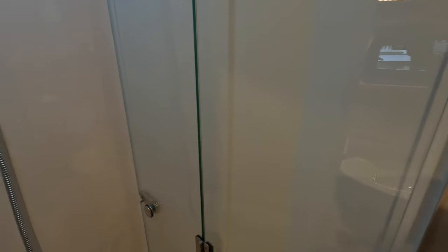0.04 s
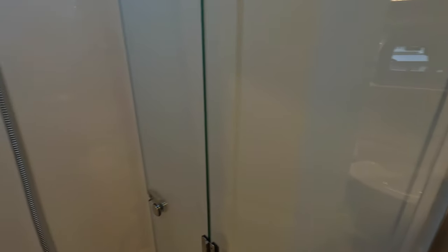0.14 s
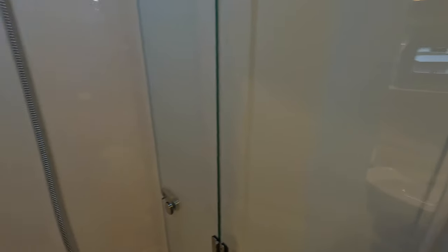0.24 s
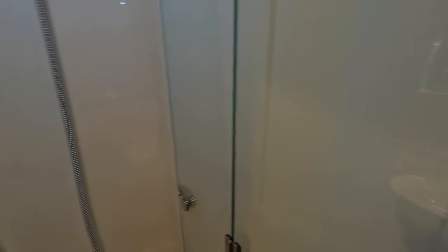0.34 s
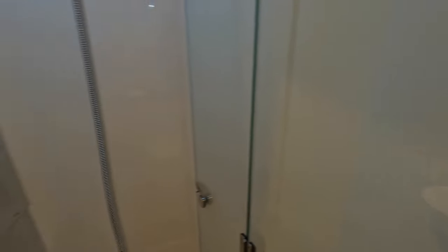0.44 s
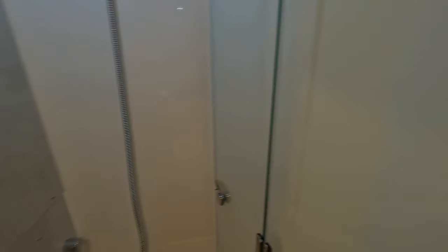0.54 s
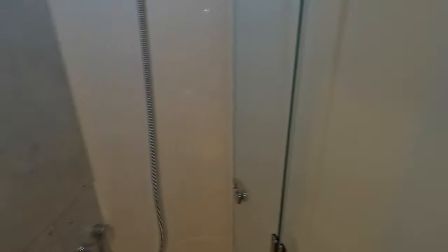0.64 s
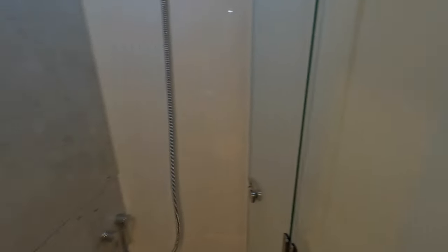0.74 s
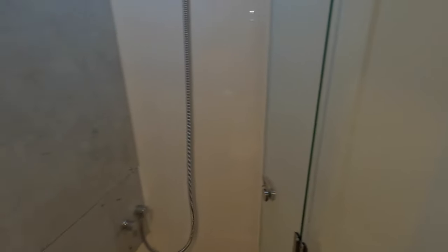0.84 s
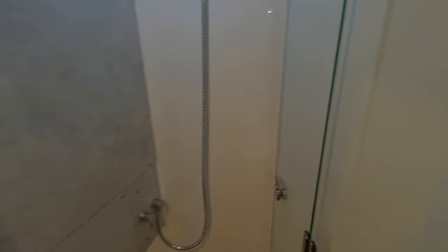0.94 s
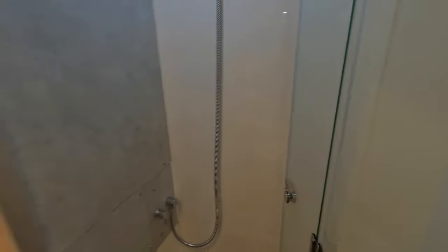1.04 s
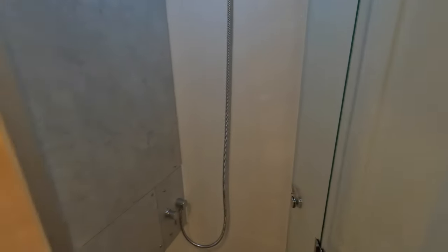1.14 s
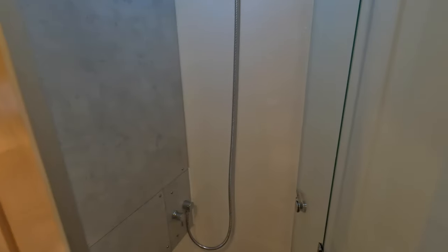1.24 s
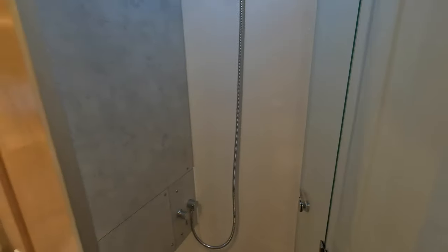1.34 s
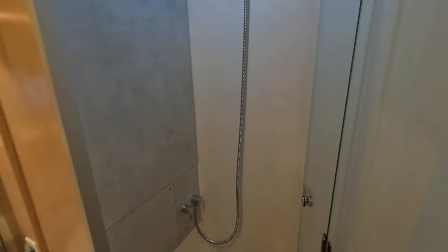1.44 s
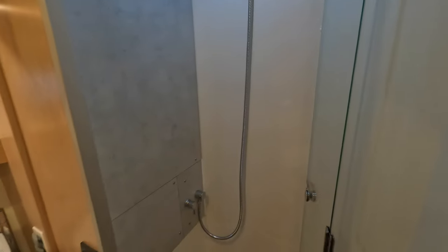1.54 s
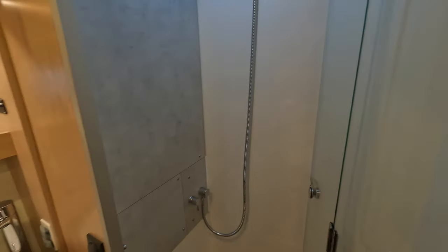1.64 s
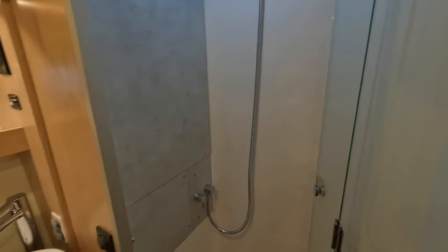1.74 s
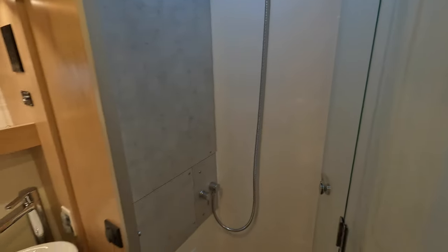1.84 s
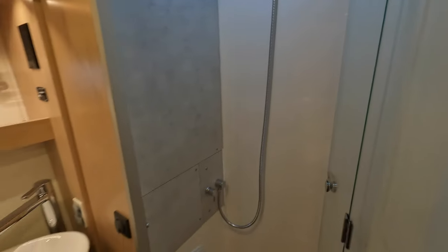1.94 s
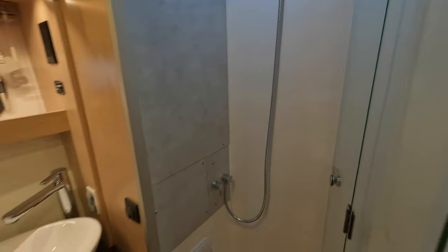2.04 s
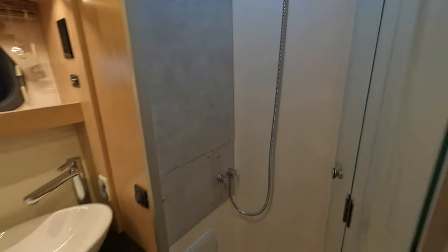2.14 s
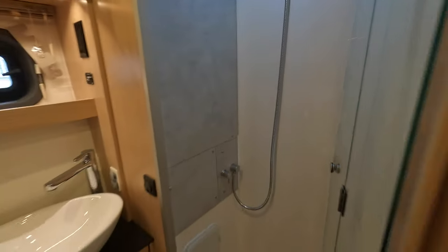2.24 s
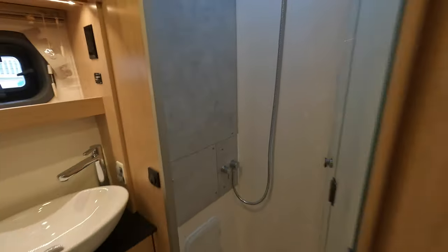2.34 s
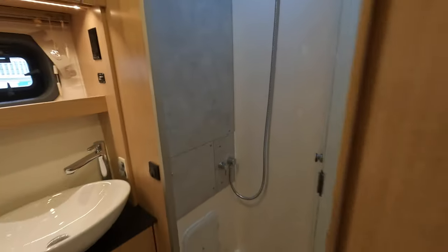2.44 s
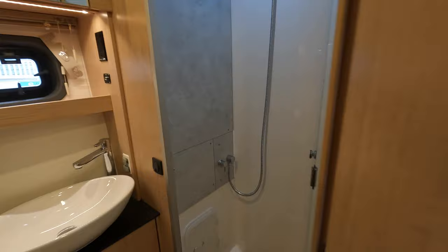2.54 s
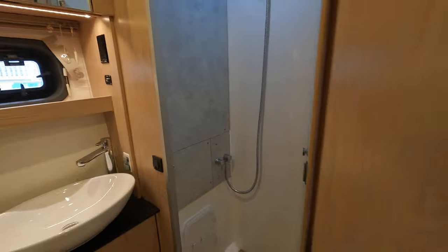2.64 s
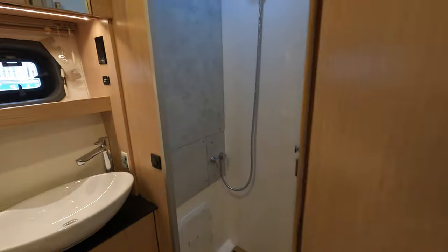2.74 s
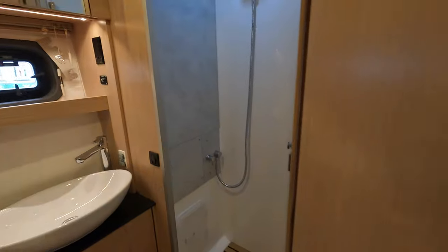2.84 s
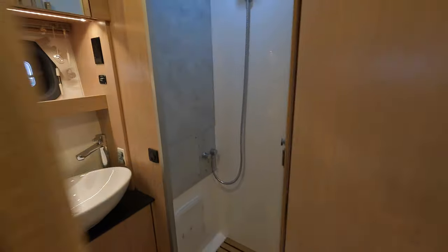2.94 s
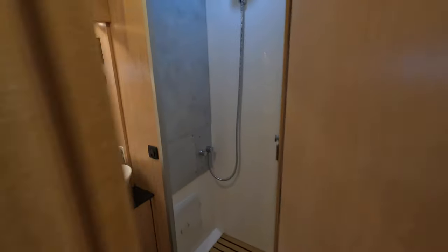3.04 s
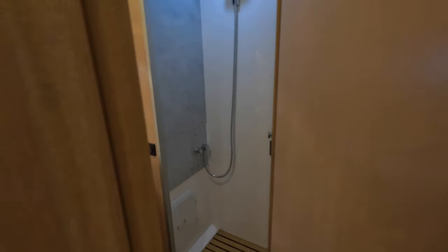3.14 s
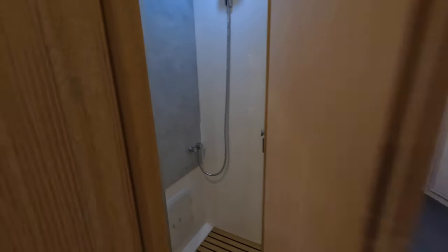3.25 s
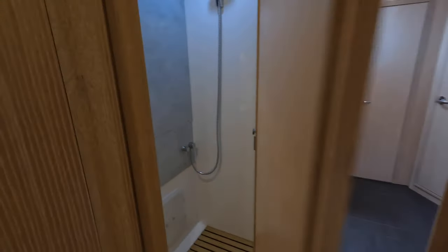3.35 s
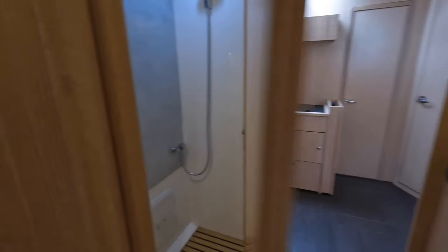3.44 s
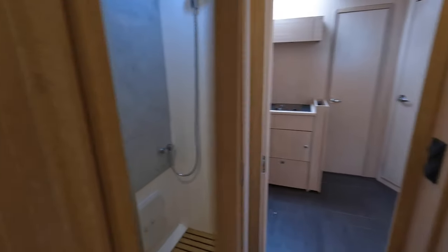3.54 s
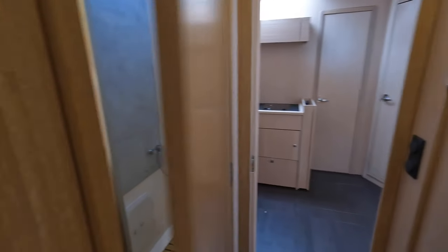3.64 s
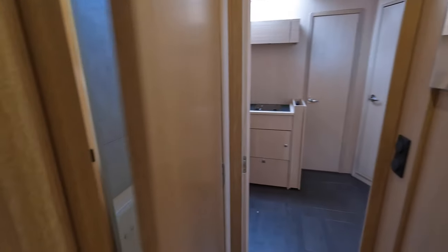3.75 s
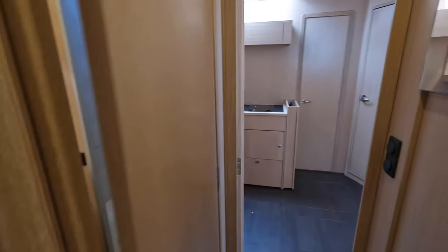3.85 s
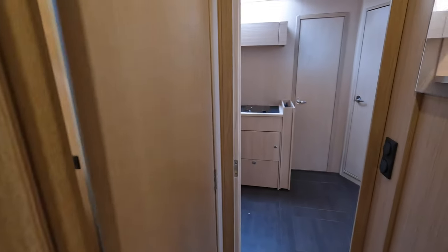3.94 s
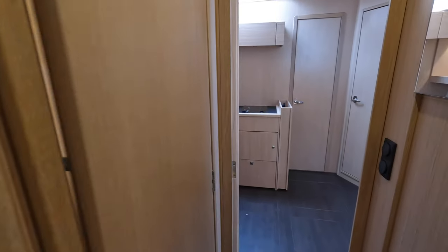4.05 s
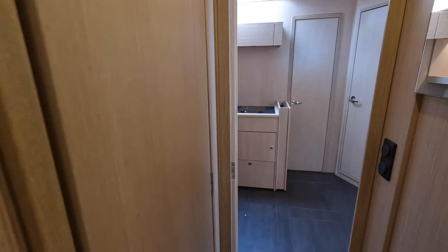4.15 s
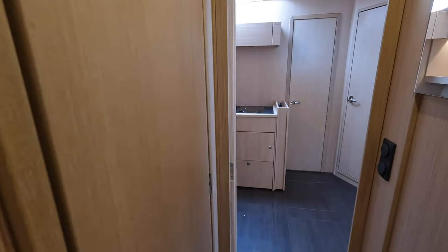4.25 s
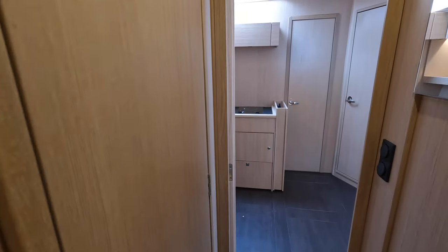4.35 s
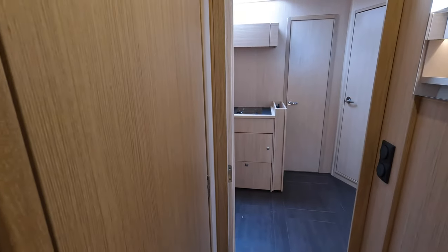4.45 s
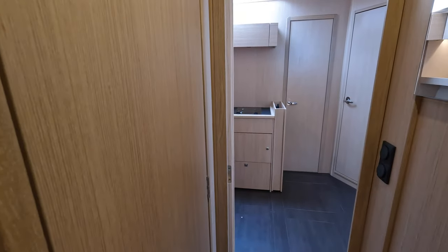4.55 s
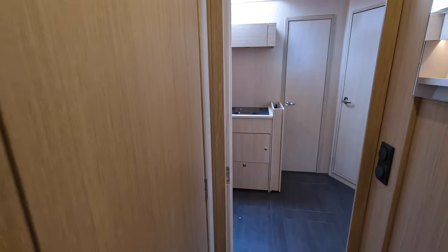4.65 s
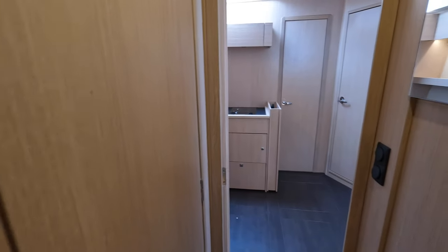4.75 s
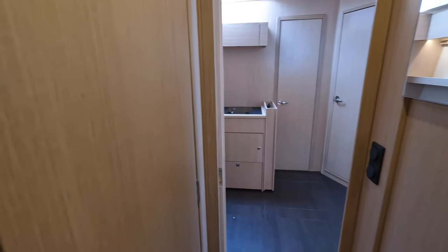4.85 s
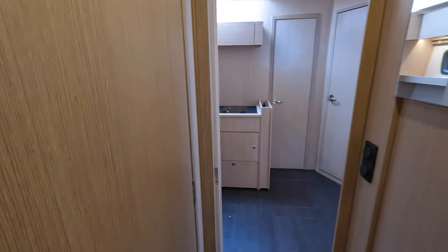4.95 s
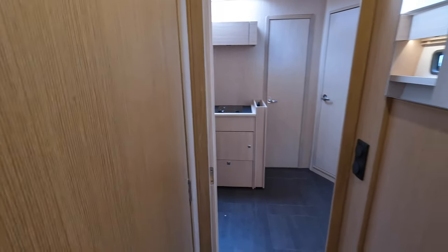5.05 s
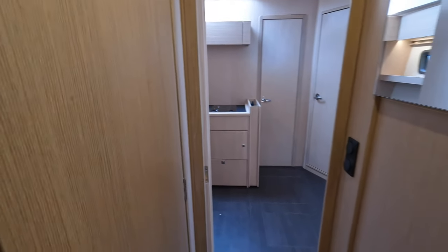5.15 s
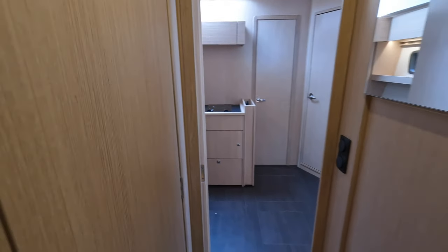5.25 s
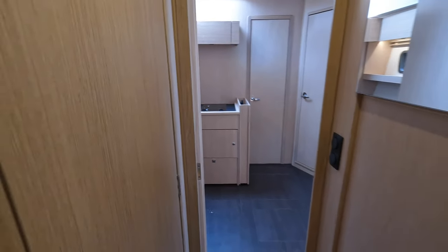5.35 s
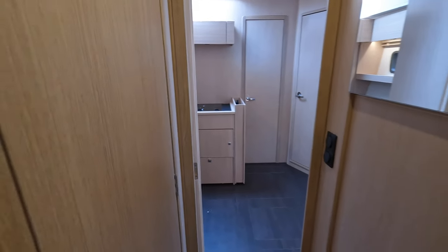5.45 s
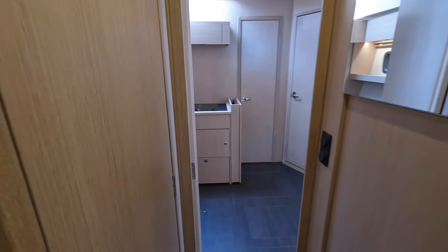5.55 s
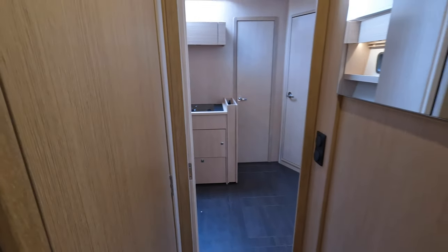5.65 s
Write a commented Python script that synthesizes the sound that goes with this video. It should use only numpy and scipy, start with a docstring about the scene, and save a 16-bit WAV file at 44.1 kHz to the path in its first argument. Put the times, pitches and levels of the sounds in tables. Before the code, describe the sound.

Quiet handheld movement over faint air noise and hiss: brief drags on panels, dull footsteps and felt thuds. Around the middle a bright metal handle click, a knock and a small catch click. Then the loudest event, a latch clack followed by a heavy low door thump with short boxy reverberation. Light jingling of fittings and two close knocks end it.

```python
"""Steps knock on sole boards, cloth rustles and drags, a handle clicks and a door swings shut: latch, then deep thump.
Someone is backing out of a small wooden boat cabin, over a low rumble of movement, air noise and microphone hiss.
Blows are filtered impulses with noise rattle and ringing modes; the door's boom is low modes driven by half-sine pushes.
Drags are uneven noise through board modes; rustle, rumble, bolt scrape and floor are coloured noise under level curves.
Thuds are short low sines, ticks noise bursts; blows, drags and bolt also feed a cabin reverberation."""
import sys
import numpy as np
from scipy import signal
from scipy.fft import rfft, irfft
from scipy.io import wavfile
from scipy.ndimage import uniform_filter1d

SR = 44100
rng = np.random.default_rng(int(sys.argv[2]) if len(sys.argv) > 2 else 0)


def to_wav(s):
    """Save 16-bit WAV."""
    ch = np.atleast_2d(s).T  # columns
    pcm = np.round(np.clip(ch, -1, 1) * 32767)  # PCM
    wavfile.write(sys.argv[1], SR, pcm.astype(np.int16))


N = 250950

# ringing of the boards: (frequency [Hz], level [dB], t60 [s])
BOARD_MODES = [(215, -4, 0.2), (266.5, -3, 0.15), (335, -7, 0.2), (410, -4, 0.12), (480, -4, 0.12),
               (572, -5, 0.06), (740, -5, 0.08)]
# ringing of the latch and small fittings: (frequency [Hz], level [dB], t60 [s])
LATCH_MODES = [(800, -4, .06), (1170, -1, .06), (1340, -3, .06), (1820, 2, .06), (2190, 2, .07),
               (3150, -3, .07), (3900, -2, .08), (4829, 2, .2), (5534, -2, .08), (6035, -2, .08),
               (7700, -2, .06)]
# colour of latch clicks, before hardness tilt, and of the bolt scrape: (frequency [Hz], level [dB])
LATCH_COLOUR = [(90, -56), (320, -19), (650, -2), (1200, -0.2), (2350, -4.5), (2700, -9), (5500, -16),
                (11000, -24), (15500, -38)]


def gain_of(db):
    """Decibels to amplitude gain."""
    return 10 ** (np.asarray(db) / 20)


def evened(x):
    """Scales to rms 1."""
    return x / np.sqrt(np.mean(x ** 2) + 1e-20)


def coloured(x, points):
    """Zero-phase filter through (frequency [Hz], level [dB]) points, linear in log frequency."""
    point_hz, point_db = np.transpose(points)
    hz = np.fft.rfftfreq(len(x), 1 / SR)
    level_db = np.interp(np.log(hz + 1), np.log(point_hz + 1), point_db)
    return irfft(rfft(x) * gain_of(level_db), len(x))


def causal(x, points):
    """Minimum-phase filter through (frequency [Hz], level [dB]) points: nothing sounds before the blow."""
    point_hz, point_db = np.transpose(points)
    hz = abs(np.fft.fftfreq(2 * len(x), 1 / SR))
    log_gain = np.log(gain_of(np.interp(np.log(hz + 1), np.log(point_hz), point_db)))
    response = np.exp(np.conj(signal.hilbert(log_gain)))
    return np.fft.ifft(np.fft.fft(x, 2 * len(x)) * response).real[:len(x)]


def curve(rows):
    """Gain over the whole scene from (time [s], level [dB]) points."""
    time_s, level_db = np.transpose(rows)
    return gain_of(np.interp(np.arange(N) / SR, time_s, level_db))


def swell(peak_s, peak_db, rise_db_per_s, fade_db_per_s):
    """Gain that climbs to a peak and fades, both at a steady rate in dB."""
    t = np.arange(N) / SR - peak_s
    return gain_of(peak_db + np.minimum(rise_db_per_s * t, -fade_db_per_s * t))


def wobble(per_s):
    """Slow random signal of rms 1: white noise averaged twice over 1 / per_s seconds."""
    width = int(SR / per_s)
    once = uniform_filter1d(rng.standard_normal(N), width)
    return evened(uniform_filter1d(once, width))


def add(mix, start_s, sound):
    """Adds a sound in place, cut at the end of the mix."""
    part = mix[round(start_s * SR):][:len(sound)]
    part += sound[:len(part)]


def decaying(hz, db, t60_s, t):
    """One mode: a sine that loses 60 dB in t60_s."""
    return gain_of(db - 60 * t / t60_s) * np.sin(2 * np.pi * hz * t)


def ring(modes, count=8192):
    """Impulse response of decaying modes, energy 1."""
    t = np.arange(count) / SR
    out = sum(decaying(hz, db, t60_s, t) for hz, db, t60_s in modes)
    return out / np.linalg.norm(out)


def strikes(blows, colour, modes, ring_db, rattle_db, rise_s):
    """Blows [near, far]: impulse, ringing and contact rattle fill the cabin; ringing and rattle also arrive directly."""
    pivot_hz = 1200  # hardness tilts the colour about this
    weight_hz = 492  # a heavy blow adds body below this
    damping = 0.55  # ringing lost, dB per dB of weight: a heavy blow stays pressed on what it strikes
    near, far, t = np.zeros(N), np.zeros(N), np.arange(8192) / SR
    onset = 1 - np.exp(-t / rise_s)  # a soft contact builds up more slowly
    free_ring = ring(modes) * onset
    for time_s, strength_db, weight_db, tilt_db_per_oct, decay_s in blows:
        ringing = gain_of(ring_db - damping * weight_db) * free_ring
        noise = rng.standard_normal(len(t))
        rattle = gain_of(rattle_db) * noise * np.exp(-t / decay_s) * onset
        tilted = []
        for hz, db in colour:
            hardness_db = tilt_db_per_oct * np.log2(hz / pivot_hz)
            body_db = weight_db / (1 + (hz / weight_hz) ** 2)
            tilted.append((hz, db + hardness_db + body_db))
        into_cabin = 1.215 * (t == 0) + 0.45 * ringing + 0.49 * rattle
        add(far, time_s, gain_of(strength_db) * causal(into_cabin, tilted))
        add(near, time_s, gain_of(strength_db) * causal(rattle + ringing, tilted))
    return np.array([near, far])


def floor():
    """Cabin air noise that drifts a little, plus steady microphone hiss."""
    # air noise, falling late in the scene: (time [s], level [dB])
    air_levels = [(0.0, -65), (4.07, -65), (5.05, -68.5), (5.69, -78)]
    # air spectrum: (frequency [Hz], density [dB per Hz])
    air_colour = [(59, -50), (100, -15.5), (219, -3.5), (280, 0), (451, -13), (595, -9), (761, -13.5),
                  (897, -12), (1560, -20), (5000, -39), (6500, -79)]
    # hiss spectrum: (frequency [Hz], density [dB per Hz])
    hiss_colour = [(2000, 0), (5000, -0.5), (12000, 2.5), (15400, -8)]
    hiss_db = -75.5
    air = evened(coloured(rng.standard_normal(N), air_colour)) * gain_of(2 * wobble(12))
    hiss = evened(coloured(rng.standard_normal(N), hiss_colour))
    return curve(air_levels) * air + gain_of(hiss_db) * hiss


def rumble():
    """Lumpy low noise from the hull and the moving hand; one strong hull shudder follows the slam."""
    # movement: (time [s], level of the deep part before lumps [dB])
    rumble_levels = [(0, -64), (.8, -49.5), (1.05, -59), (1.6, -61.5), (2.45, -54.5), (2.7, -63.5),
                     (2.95, -49.5), (3.4, -51), (4.19, -62), (4.4, -51.5), (5, -57), (5.15, -47.5),
                     (5.35, -59.5), (5.69, -58)]
    # shudder: (peak time [s], peak level [dB], swell [dB per s], fade [dB per s])
    shudder = 4.5, -33, 3000, 95
    upper_db, shudder_upper_db = -8.5, -1  # upper band relative to deep
    deep_colour = [(10, -34.5), (22, 15.5), (45, 2.5), (65, 3.5), (100, -52.0)]  # (Hz, dB)
    upper_colour = [(40, -30), (62, 9.5), (100, 6.0), (150, -2.0), (300, -49.5)]  # (Hz, dB)
    deep = evened(coloured(rng.standard_normal(N), deep_colour))
    upper = evened(coloured(rng.standard_normal(N), upper_colour))
    lumps = gain_of(3 * wobble(15))
    moving = curve(rumble_levels) * (deep + gain_of(upper_db) * upper)
    return lumps * moving + swell(*shudder) * (deep + gain_of(shudder_upper_db) * upper)


def drags():
    """Cloth on a panel: uneven slips excite the board modes nearest the contact, plus a brighter scrape."""
    # drags: (start [s], length [s], start level [dB], end level [dB], scrape share [dB], favoured mode [Hz])
    slides = [(0.01, 0.1, -67.5, -75, 13.5, 630), (0.417, 0.049, -53.5, -54.5, -8.5, 335),
              (0.627, 0.098, -54, -48, -5, 353), (0.748, 0.053, -41.5, -42.5, -9.5, 327),
              (2.23, 0.13, -42.5, -44.5, -9.5, 243), (2.7, 0.27, -74.5, -70, 5.5, 554)]
    grip_db_per_s, release_db_per_s = 616, 338
    scrape_colour = [(150, -24), (500, 11.5), (900, 11.5), (1600, 5.0), (3300, -8.0), (5000, -19.0)]  # (Hz, dB)
    slips = rng.standard_normal(N) * gain_of(1.16 * wobble(160))
    bodies = []
    for mode in BOARD_MODES:
        ringing = signal.fftconvolve(slips, ring([mode]))[:N]
        bodies.append((mode[0], gain_of(mode[1]) * evened(ringing)))
    scrape = evened(coloured(slips, scrape_colour))
    out, t = np.zeros(N), np.arange(N) / SR
    for start_s, length_s, start_db, end_db, scrape_db, favoured_hz in slides:
        end_s = start_s + length_s
        # other modes lose 10 dB per octave of distance
        body = sum(b * gain_of(-10 * abs(np.log2(hz / favoured_hz))) for hz, b in bodies)
        grip_db = grip_db_per_s * np.minimum(t - start_s, 0)
        release_db = -release_db_per_s * np.maximum(t - end_s, 0)
        level_db = np.interp(t, [start_s, end_s], [start_db, end_db]) + grip_db + release_db
        out += gain_of(level_db) * (body + gain_of(scrape_db) * scrape)
    return out


def rustle():
    """Cloth swishes: dense tiny fibre snaps, each swish with its own treble tilt."""
    # swishes: (peak time [s], peak level [dB], swell [dB per s], fade [dB per s], treble tilt [dB per octave])
    swishes = [(0.052, -51, 49, 216, 5.5), (.89, -66.5, 19, 33, 6), (1.09, -63, 501.5, 34, -0.5),
               (2.27, -60.5, 45, 37, 6.5), (2.841, -67, 593.5, 55, 14), (3.05, -63, 55, 397.5, 12)]
    # fibre snap spectrum: (frequency [Hz], density [dB per Hz])
    snap_colour = [(2500, 7.5), (4500, 0.5), (7000, 4), (10000, 2), (14000, -2.5), (16000, -9)]
    snaps = coloured(rng.standard_normal(N) * gain_of(1.2 * wobble(300)), snap_colour)
    out = np.zeros(N)
    for *shape, tilt_db in swishes:
        tilted = coloured(snaps, [(4000, -tilt_db), (16000, tilt_db)])
        out += swell(*shape) * evened(tilted)
    return out


def ticks():
    """Dry snaps heard directly: noise decaying in milliseconds, with a faint longer tail."""
    # snaps, alone or at the front of a latch or door blow: (time [s], level [dB], centre [Hz])
    snap_rows = [(.128, -41, 9600), (1.9, -56, 2860), (3.073, -25.5, 7000), (3.732, -37, 7100),
                 (4.4078, -17, 9190), (5.672, -44, 5870)]
    out, t = np.zeros(N), np.arange(1300) / SR
    envelope = np.exp(-t / 0.0019) + 0.14 * np.exp(-t / 0.0051)
    for time_s, db, hz in snap_rows:
        snap = rng.standard_normal(len(t)) * envelope
        # rises towards the centre, then steps down to -6 dB above 0.98 of it
        colour = [(hz / 3, -20), (hz, 3), (hz * 0.98, -6)]
        add(out, time_s, gain_of(db) * coloured(snap, colour) * (t < 0.02))
    return out


def thuds():
    """Soft footfalls and bumps felt through the hull: a few low cycles under a smooth swell."""
    # thuds: (start [s], peak level [dB], pitch [Hz], length [cycles])
    bumps = [(0.467, -42.5, 43, 3.3), (0.697, -33.5, 60.5, 4.6), (0.756, -32, 93, 11.4),
             (1.691, -43, 29.7, 4.4), (1.886, -32.5, 50, 2.7), (1.929, -27.5, 36.5, 2.6),
             (1.938, -40.5, 128.6, 4.4), (2.025, -40.5, 58, 2.9), (2.471, -44.5, 44.7, 2.4),
             (3.314, -42, 63, 3.7)]
    out = np.zeros(N)
    for start_s, db, hz, cycles in bumps:
        u = np.arange(0, 1, hz / cycles / SR)  # share of the thud elapsed
        envelope = np.sin(np.pi * u ** 0.48) ** 2  # peaks early
        add(out, start_s, gain_of(db) * envelope * np.sin(2 * np.pi * cycles * u))
    return out


def steps():
    """Knocks on the sole boards: blows that ring the board modes."""
    # knocks: (time [s], strength [dB], weight [dB], hardness tilt [dB per octave], rattle decay [s])
    knocks = [(1.0665, -16, 18.5, 4, 0.048), (1.1561, -18.5, 12.5, 2, 0.039), (1.4535, -15.5, 15, 4, 0.037),
              (3.4197, -2, -5.5, -0.3, 0.015), (5.098, 3, -10.5, 0, 0.016),
              (5.1315, 0.5, -14.5, -0.5, 0.023), (5.284, -25.5, -5, -1, 0.016)]
    # colour before tilt and weight: (frequency [Hz], level [dB])
    knock_colour = [(90, 4), (250, 12), (700, 0), (1400, -4.5), (2350, -12), (2700, -17.5), (5500, -28),
                    (11000, -37.5)]
    return strikes(knocks, knock_colour, BOARD_MODES, ring_db=-23.0, rattle_db=-22.0, rise_s=0.0026)


def fittings():
    """Small fittings that jiggle: light taps with strong latch-mode ringing."""
    # taps: (time [s], strength [dB], weight [dB], hardness tilt [dB per octave], rattle decay [s])
    jiggles = [(1.6392, -24.5, 0.25, 0, 0.013), (2.6704, -22, .3, -1, 0.037),
               (2.927, -21.5, 5.8, -11, 0.027), (4.5945, -21, 1, 4, 0.0086), (4.6480, -23, .3, 0.5, 0.012),
               (4.7495, -25, 0.48, -2.5, 0.0042)]
    # colour before tilt and weight: (frequency [Hz], level [dB])
    tap_colour = [(90, -29), (320, -24), (700, -14), (1300, -4), (2200, -14), (3000, -12.5), (5500, -33.5),
                  (11000, -51)]
    return strikes(jiggles, tap_colour, LATCH_MODES, ring_db=0.95, rattle_db=-17.5, rise_s=0.00036)


def handle():
    """Handle clicks: hard contacts that ring the latch modes."""
    # clicks: (time [s], strength [dB], weight [dB], hardness tilt [dB per octave], rattle decay [s])
    clicks = [(3.0743, 2, -5, 2, 0.013), (3.3199, -22.5, 25, 0, 0.0067)]
    return strikes(clicks, LATCH_COLOUR, LATCH_MODES, ring_db=-7, rattle_db=-25.5, rise_s=0.00046)


def cupboard_catch():
    """A cupboard catch: one click that rings its own modes."""
    # click: (time [s], strength [dB], weight [dB], hardness tilt [dB per octave], rattle decay [s])
    catch_blows = [(3.7325, -10, 5, 2.1, 0.013)]
    # ringing: (frequency [Hz], level [dB], t60 [s])
    catch_modes = [(750, 0, .15), (960, 0, .25), (1820, 0, .1), (3450, 4, .03), (4300, 0, .06),
                   (6980, 3, .05)]
    return strikes(catch_blows, LATCH_COLOUR, catch_modes, ring_db=-1.5, rattle_db=-28.0, rise_s=0.0014)


def door():
    """Door blows, on the latch and then into the frame, that ring the door modes."""
    # blows: (time [s], strength [dB], weight [dB], hardness tilt [dB per octave], rattle decay [s])
    door_blows = [(4.1894, -7.5, 1.5, 1.5, 0.015), (4.198, 8, -11, -3, 0.0058),
                  (4.4085, 9, 13.5, 0.92, 0.0076)]
    # colour before tilt and weight: (frequency [Hz], level [dB])
    door_colour = [(90, -5.5), (200, -0.5), (450, -5.5), (1200, -5.5), (1750, 0.5), (2350, -10.5),
                   (2650, -11), (3800, -14.5), (5500, -18.5), (10000, -16), (15500, -19.5)]
    # ringing: (frequency [Hz], level [dB], t60 [s])
    door_modes = [(205, -3, .4), (330, -1, .35), (383, -1, .26), (640, -1, .12), (953, 2, .26),
                  (1130, -3, .2), (1362, -8, .19), (1688, 3, .1), (2019, -2, .12), (2290, 0, .12),
                  (3650, 5, .08)]
    return strikes(door_blows, door_colour, door_modes, ring_db=-8, rattle_db=-16.0, rise_s=0.0023)


def boom():
    """The door shoves the cabin air: half-sine pushes drive the lowest modes."""
    # door leaf and cabin air: (frequency [Hz], level [dB], t60 [s])
    boom_modes = [(24.6, -26.5, .5), (29.6, -12, 0.87), (34.4, -20.5, 1), (75.36, -19.5, 0.86),
                  (103.5, -10, 0.3), (128, -18, 0.22), (173, -31, 0.35), (212.7, -13.5, 0.39)]
    # pushes, the last a rebound in the frame: (time [s], level [dB], length [s], share of modes above 50 Hz [dB])
    pushes = [(4.2, -16.5, 0.0074, 1.5), (4.4145, -4, 0.01, 7.5), (4.4515, -16.5, 0.0079, 17)]
    out, t = np.zeros(N), np.arange(SR) / SR
    for time_s, push_db, length_s, upper_db in pushes:
        push = np.sin(np.pi * np.arange(0, 1, 1 / (length_s * SR)))
        modes = np.zeros(SR)
        for hz, db, t60_s in boom_modes:
            modes -= decaying(hz, db + upper_db * (hz > 50), t60_s, t)  # inward first
        add(out, time_s, gain_of(push_db) * signal.fftconvolve(modes, push / push.sum()))
    return out


def bolt():
    """The latch bolt scrapes over its plate: noise that grows until the door meets the frame."""
    start_s = 4.394
    scrape = evened(coloured(rng.standard_normal(N), LATCH_COLOUR))
    level = swell(peak_s=4.408, peak_db=-30, rise_db_per_s=900, fade_db_per_s=1500)
    return (np.arange(N) > start_s * SR) * level * scrape


def cabin(x):
    """Cabin reverberation: sparse impulses of random sign, each band dying at its own speed."""
    # reverberation: (frequency [Hz], t60 [s])
    cabin_t60 = [(150, 0.3), (500, 0.35), (1500, 0.28), (4000, 0.31), (8000, 0.35), (14000, 0.17)]
    impulses = np.zeros(SR // 2)
    at = np.arange(60, len(impulses) - 12, 12)  # one per 12 samples, jittered below
    impulses[at + rng.integers(0, 12, len(at))] = rng.choice([-1., 1.], len(at))
    hz, t, z = signal.stft(impulses, SR, nperseg=256)
    point_hz, point_t60_s = np.transpose(cabin_t60)
    t60_s = np.interp(np.log(hz + 1), np.log(point_hz), point_t60_s)
    tail = signal.istft(z * gain_of(-60 * t / t60_s[:, None]), SR, nperseg=256)[1]
    return signal.fftconvolve(x, tail / np.linalg.norm(tail))[:N]


def scene():
    """Blows, drags and bolt sound directly and fill the cabin; all else reaches the microphone only directly."""
    near, far = steps() + handle() + cupboard_catch() + door() + fittings()
    rubbed = drags() + bolt()
    wet = cabin(far) + gain_of(-6.5) * cabin(rubbed)
    direct = near + rubbed + ticks() + boom() + thuds() + rumble() + rustle() + floor()
    return (direct + wet)[None]


def record(dry):
    """The microphone loses the deepest bass; then a steep low-pass limits the band."""
    bass_cut_hz, edge_hz = 14.0, 15750
    high_pass = signal.butter(2, bass_cut_hz, "high", fs=SR, output="sos")
    low_pass = signal.firwin(511, edge_hz, window=("kaiser", 9), fs=SR)
    thinned = signal.sosfilt(high_pass, dry)
    return signal.oaconvolve(thinned, low_pass[None], "same")


dry = scene()
out = record(dry)
to_wav(out)
```